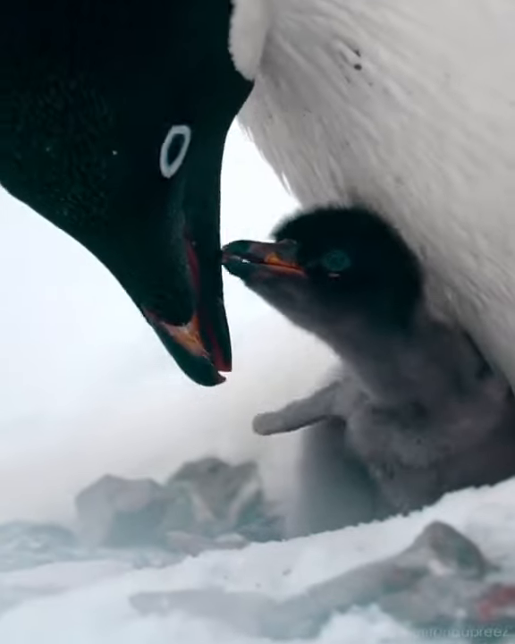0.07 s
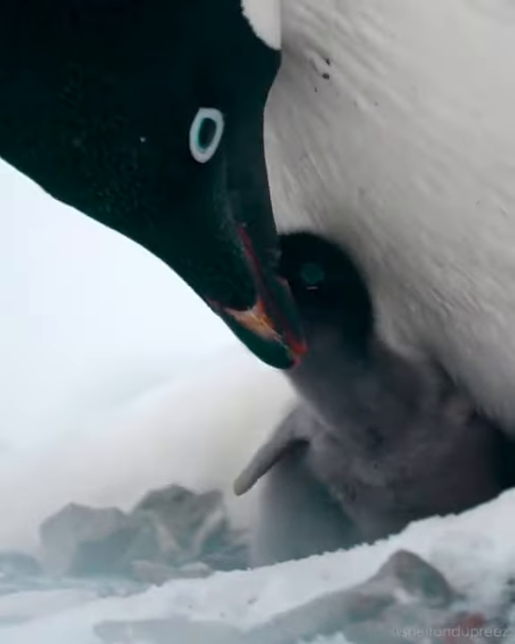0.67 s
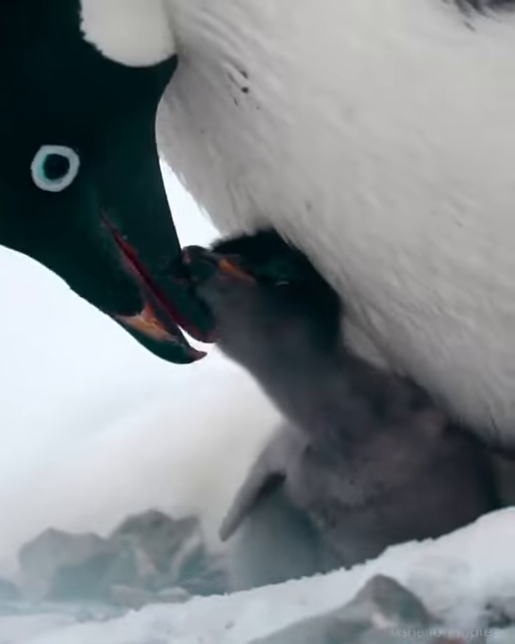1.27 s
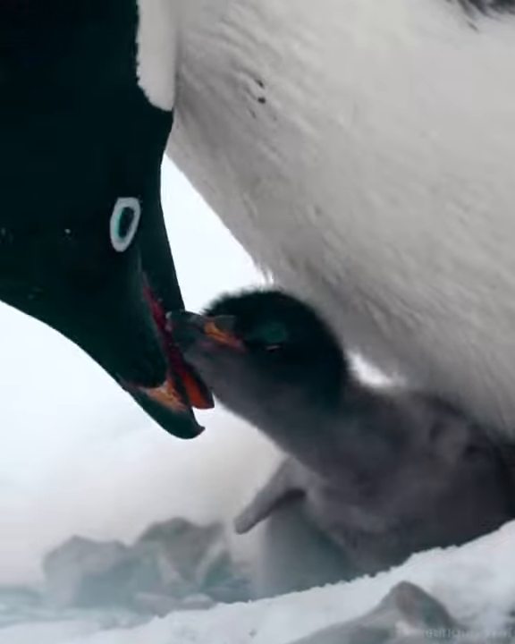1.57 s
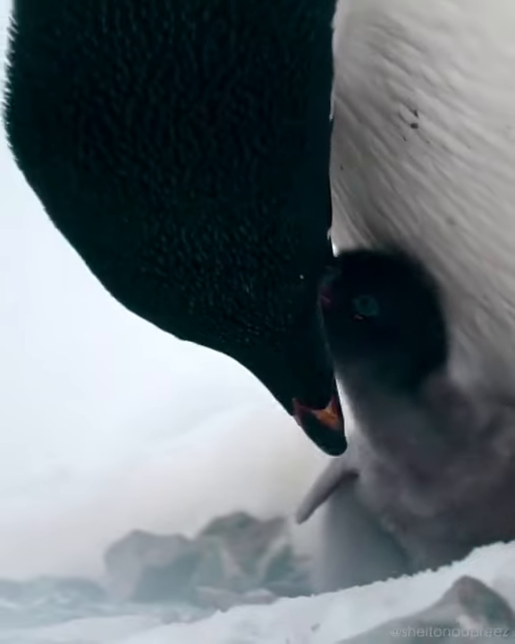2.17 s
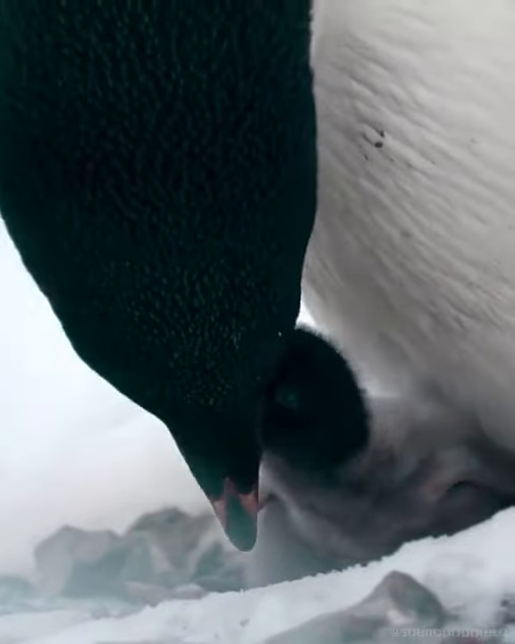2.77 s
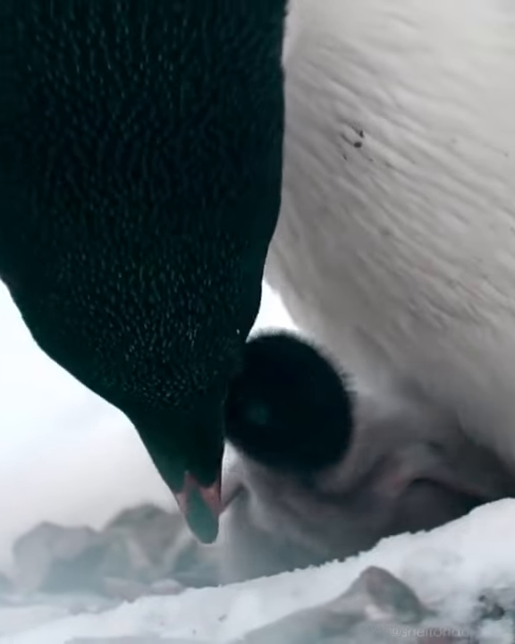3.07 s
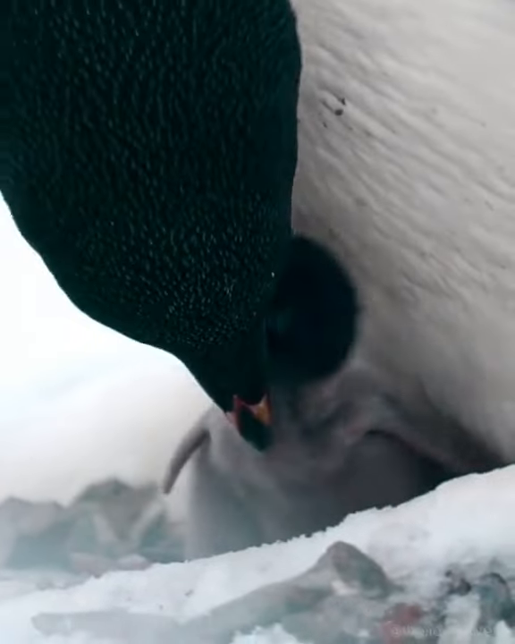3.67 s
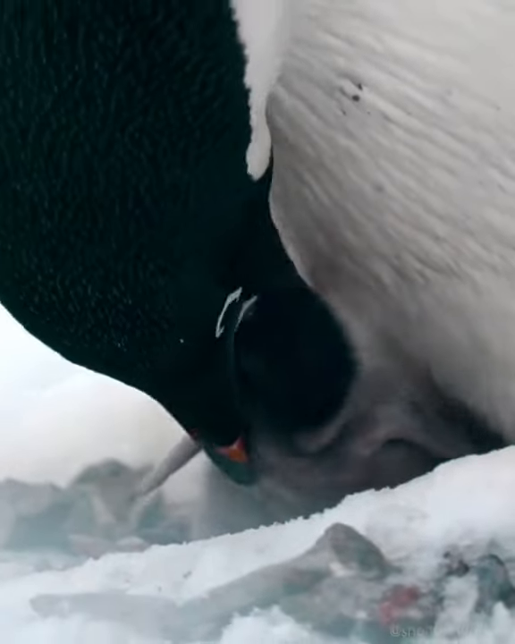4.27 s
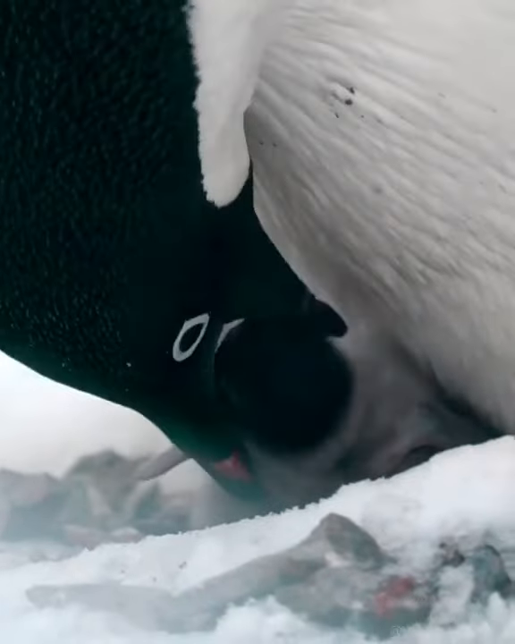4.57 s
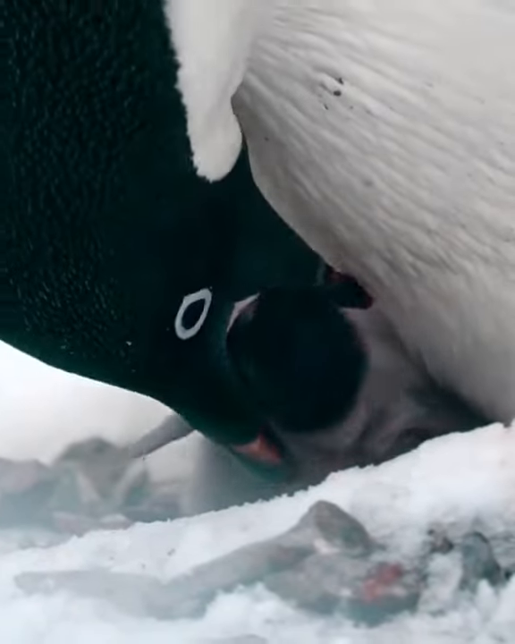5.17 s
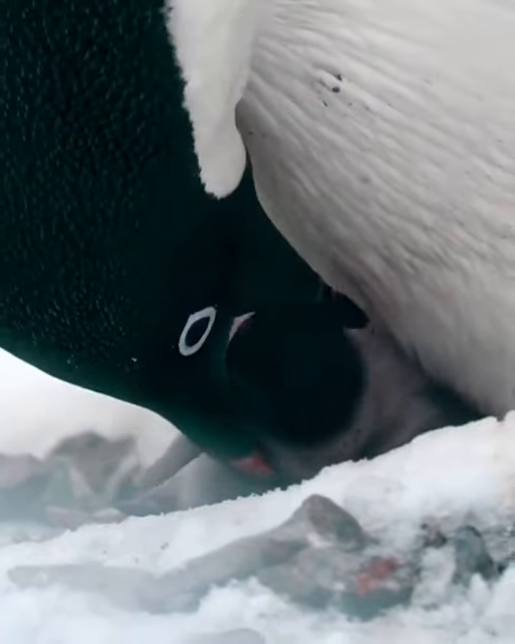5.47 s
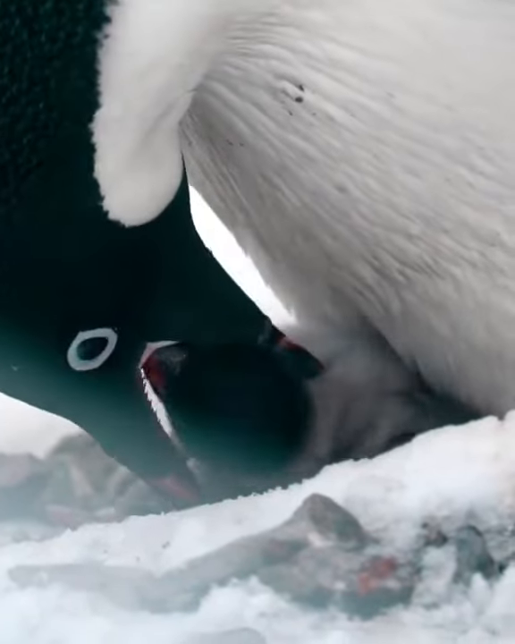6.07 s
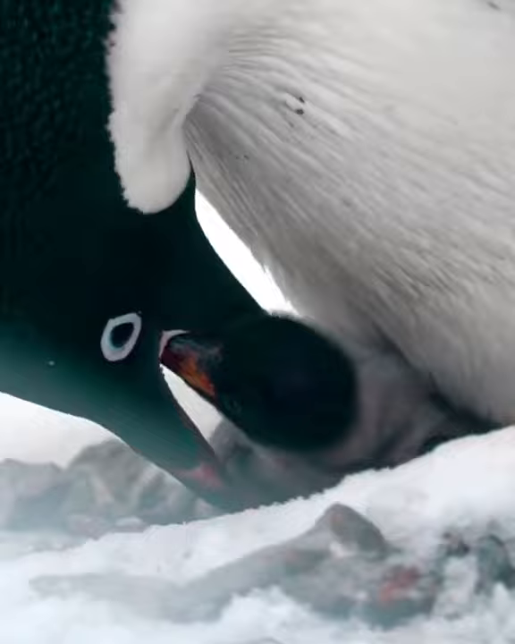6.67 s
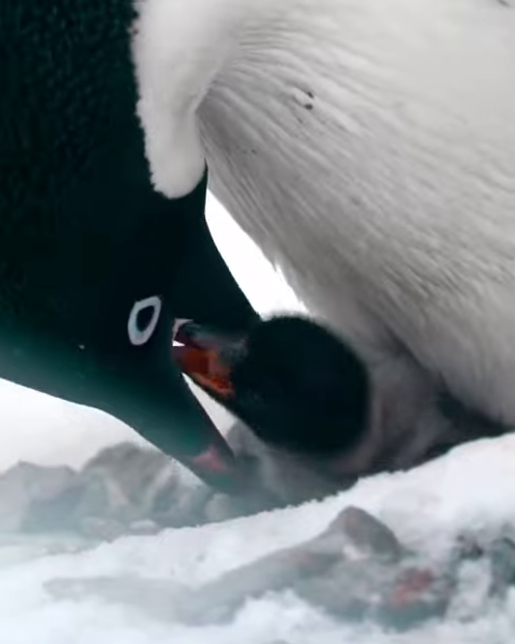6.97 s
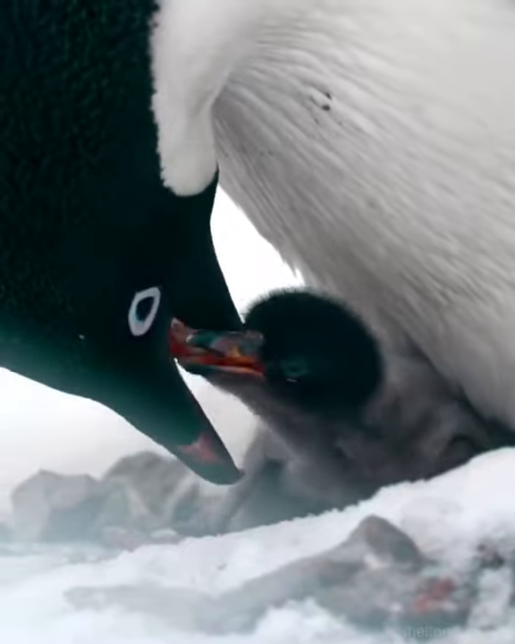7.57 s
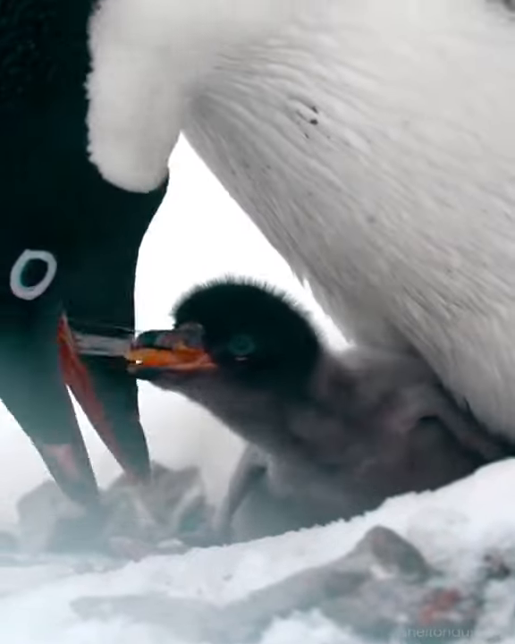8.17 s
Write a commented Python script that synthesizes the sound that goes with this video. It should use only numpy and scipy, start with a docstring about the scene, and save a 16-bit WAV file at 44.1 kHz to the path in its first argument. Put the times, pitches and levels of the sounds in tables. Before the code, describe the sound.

An adult penguin gives a harsh, throbbing bray close by while chicks peep and rasp for food, with wet bill clicks.

```python
"""Penguin at a snowy nest

Close to a stereo microphone, an adult bends over its chicks and brays with both sides of its syrinx:
a growl, a run of throbs and a long indrawn note. The chicks whistle and rasp for food, and wet bills
click and smack. Soft low bumps buffet the microphone; stones answer in the faint air of the colony."""
import sys
import numpy as np
from scipy import signal
from scipy.fft import rfft, irfft, next_fast_len
from scipy.io import wavfile
from scipy.ndimage import uniform_filter1d, map_coordinates

SR = 44100
rng = np.random.default_rng(int(sys.argv[2]) if len(sys.argv) > 2 else 0)


def generate_wav(signal):
    """Clip the signal to [-1, 1] and save it as 16-bit WAV at the path in sys.argv[1]."""
    frames = np.transpose(np.atleast_2d(signal))
    scaled = np.clip(frames, -1, 1) * 32767
    pcm = np.round(scaled).astype(np.int16)
    wavfile.write(sys.argv[1], SR, pcm)


N = 371322


def amp(db):
    """Decibels to gain."""
    return 10 ** (np.asarray(db) / 20)


def unit(x):
    """Scale to rms 1."""
    return x / np.sqrt(np.mean(x ** 2) + 1e-20)


def clock():
    """The time of every sample, in seconds."""
    return np.arange(N) / SR


def along(points, hz):
    """Read (Hz, value) points at hz, on a log axis."""
    freqs, values = np.transpose(points)
    return np.interp(np.log(hz + 1), np.log(freqs + 1), values)


def curves(rows):
    """One value per sample for each column after the time."""
    times, *columns = np.transpose(rows)
    return [np.interp(clock(), times, column) for column in columns]


def gate(t, start, end, edge):
    """A window from start to end, with fades of edge seconds centred on both."""
    return np.sin(np.pi / 2 * np.clip(np.minimum(t - start, end - t) / edge + .5, 0, 1)) ** 2


def wobble(rate, size=N):
    """A smooth random curve, rate knots a second."""
    knots = rng.standard_normal(int(size * rate / SR) + 4)
    return map_coordinates(knots, [np.arange(size) * rate / SR])


def add(track, start, sound):
    """Mix a sound into a track from start seconds on."""
    part = track[..., max(round(start * SR), 0):][..., :sound.shape[-1]]
    part += sound[..., :part.shape[-1]]


def coloured(x, points):
    """x through a minimum-phase filter with the given (Hz, dB) shape."""
    size = 8192
    cepstrum = irfft(np.log(amp(along(points, np.fft.rfftfreq(size, 1 / SR)))), size)
    cepstrum[1:size // 2] *= 2
    cepstrum[size // 2 + 1:] = 0
    return signal.oaconvolve(x, irfft(np.exp(rfft(cepstrum)), size))[:N]


def noise(points):
    """Coloured noise of rms 1."""
    return unit(coloured(rng.standard_normal(N), points))


def highpass(order, hz):
    """The sections of a Butterworth low cut."""
    return signal.butter(order, hz, "high", fs=SR, output="sos")


def shifting(x, depth_db, size=512):
    """x at rms 1, with resonances that come and go."""
    spectra = signal.stft(x, nperseg=size)[2]
    field = uniform_filter1d(rng.standard_normal(spectra.shape), size=4, axis=0)
    field = uniform_filter1d(field, size=10, axis=1)
    return unit(signal.istft(spectra * amp(depth_db * unit(field)), nperseg=size)[1][:N])


def spread(mid, side):
    """Left and right from mid and side."""
    return np.array([mid + side, mid - side])


def membrane(hz, waver, jitter, shimmer_db, rough):
    """One side of the syrinx: uneven pulses, with a puff of turbulence in each cycle."""
    cycles = np.cumsum(hz * (1 + waver * wobble(110))) / SR
    beats = np.arange(1, int(cycles[-1]))
    chance = rng.standard_normal((N // 32, 2))[:len(beats)]
    scatter = np.interp(beats, cycles, jitter * np.ones(N)) * chance[:, 0]
    at = np.interp(beats + scatter, cycles, np.arange(N))
    size = amp(shimmer_db * chance[:, 1])
    first, late = at.astype(int), at % 1  # each pulse is shared between two samples
    pulses = np.bincount(first, size * (1 - late), N + 1) + np.bincount(first + 1, size * late, N + 1)
    puffs = rng.standard_normal(N) * (1 + np.cos(2 * np.pi * cycles)) ** 2
    return unit(pulses[:N]) + rough * unit(puffs)


# The air behind the nest. Each row: frequency in Hz, gain in dB.
AIR_TONE = [(25, -4.5), (120, -3), (400, -7), (900, -7), (1600, 6.5), (2600, -10), (4000, -13),
            (7000, -20.5), (14000, -31.5), (16000, -45)]


def colony_air():
    """A faint, steady wash of noise, wide across the microphone."""
    return spread(amp(-76.5) * noise(AIR_TONE), amp(-77.5) * noise(AIR_TONE))


# The echo around the nest. Each row: frequency in Hz, time to fall 60 dB in seconds.
STONE_DECAY = [(200, 1), (1500, 0.49), (8000, 0.2)]


def stone_echo(x):
    """The short, scattered answer of the nearby stones, 5 ms late and almost mono."""
    hz, t, spectra = signal.stft(rng.standard_normal((2, SR // 3)), SR, nperseg=256)
    decay = amp(-60 * t / along(STONE_DECAY, hz)[:, None])
    mid, side = signal.istft(spectra * decay, SR, nperseg=256)[1]
    tail = spread(mid, amp(-36) * side) / np.linalg.norm(mid)
    return signal.fftconvolve(np.pad(x, (SR // 200, 0))[None], tail, axes=1)[:, :N]


# Three short, rough grunts, like throbs of another penguin's bray.
# Each row: centre and length in seconds, level in dB, pitch in Hz.
ADULT_GRUNTS = [(0.101, 0.051, -45.5, 304), (0.174, 0.041, -49.5, 258.3), (0.279, 0.073, -52.5, 276)]
# The grunting throat. Each row: frequency in Hz, gain in dB.
GRUNT_TONE = [(150, -21), (300, -2.5), (550, -11), (900, -20), (1350, 1), (1900, -1.5), (2600, -32.5),
              (3550, -14), (4200, -34.5), (8000, -56)]


def grunts():
    """Short, very rough pushes of an adult's voice."""
    t = clock()
    centres, _, _, pitches = np.transpose(ADULT_GRUNTS)
    voice = membrane(np.interp(t, centres, pitches), waver=.04, jitter=.07, shimmer_db=2, rough=.3)
    voice += .7 * rng.standard_normal(N)
    level = sum(amp(db - 7 * ((t - centre) / (length / 2)) ** 2)
                for centre, length, db, _ in ADULT_GRUNTS)
    return level * unit(coloured(voice, GRUNT_TONE))


# Knocks right on the microphone. Each row: start in seconds, level in dB, pitch in Hz.
MIC_BUMPS = [(0.294, -43, 290), (0.642, -42, 193), (0.731, -43.5, 145), (0.938, -44.5, 180),
             (0.997, -46, 187), (4.027, -45, 226), (4.059, -48, 133), (4.934, -44, 187), (5.057, -47, 160),
             (5.28, -50, 188), (6.467, -44, 179), (6.873, -47.5, 222), (7.084, -48.5, 193.8),
             (7.171, -49, 196), (7.308, -41, 280), (7.445, -45.5, 157), (7.547, -42, 186),
             (7.624, -37.5, 170), (7.763, -41.5, 133), (7.866, -42.5, 195.8), (7.935, -46, 157),
             (8.222, -37.5, 176.5), (8.38, -45.5, 241)]
# Spells of low patter on it. Each row: start in seconds, end in seconds, level in dB.
MIC_PATTERS = [(0, 0.828, -66), (0.932, 1.252, -59.5), (1.73, 3.969, -76), (3.993, 4.76, -64.5),
               (4.901, 5.123, -63), (5.564, 6.59, -73.5), (6.968, 7.39, -58.5), (7.44, 7.998, -55.5),
               (7.985, 8.45, -61.5)]
# The dull noise in both. Each row: frequency in Hz, gain in dB.
BUFFET_TONE = [(25, -37.5), (55, -32), (100, 0), (170, 1.5), (260, -5.5), (400, -15.5), (800, -31.5),
               (2000, -71)]


def buffeting():
    """Dull knocks and a patter of smaller, rounded ones, unlike on the two sides of the microphone."""
    bumps, t = np.zeros((2, N)), np.arange(SR // 8) / SR
    thud = noise(BUFFET_TONE)
    rise = t / .0092
    swell = (rise * np.exp(1 - rise)) ** 2
    for start, db, hz in MIC_BUMPS:
        for track, (detune, turn, place) in zip(bumps, rng.random((2, 3))):
            push = swell * np.sin(2 * np.pi * (hz * np.exp(.27 * (detune - .5)) * t + turn))
            scuff = swell * unit(thud[int(place * SR):][:len(t)])
            add(track, start, amp(db - 5) * (push + .82 * scuff))
    bumps = signal.sosfilt(highpass(2, 85), bumps)
    spells = sum(amp(db) * gate(clock(), start, end, .055) for start, end, db in MIC_PATTERS)
    level = (amp(-83.5) + spells) * unit(amp(1.5 * wobble(17)))  # a faint patter lasts between spells
    lumps = amp(8 * np.tanh(wobble(55)))
    patter = [level * unit(lumps * noise(BUFFET_TONE)) for _ in range(2)]
    stereo = spread(mid=patter[0] + bumps[0], side=amp(4) * patter[1] + amp(3) * bumps[1])
    return stereo * amp([[1], [-1]])  # a little louder on the left


# The crackle of wet bills, heard close. Each row: frequency in Hz, gain in dB.
WET_BILL_TONE = [(800, -20), (2000, -2.5), (3200, 0.5), (4500, -3.5), (6500, -17), (9000, -32),
                 (13000, -33.5), (15000, -49)]


def bill_smacks(per_second=4.3):
    """Wet bills, locked for feeding, give off tiny bright bursts of crackle."""
    t = np.arange(SR // 20) / SR
    onsets = (rng.random(N) < per_second / SR) * rng.uniform(.3, 1, N)
    bursts = signal.fftconvolve(onsets, amp(-60 * t / .05) * (1 - np.exp(-t / .0065)))[:N]
    crackle = unit(coloured(bursts * rng.standard_normal(N) ** 3, WET_BILL_TONE))
    return amp(-77.5) * gate(clock(), start=3.6, end=6.45, edge=.1) * crackle


# Bills snapping, straight ahead. Each row: start in seconds, level in dB, ring in Hz.
BILL_CLICKS = [(1.108, -46.5, 3950), (2.989, -34.5, 2600), (5.909, -45, 1900), (3.639, -35, 2857),
               (3.805, -35.5, 2900), (3.941, -40.5, 2950), (4.25, -35, 2650), (4.411, -35, 2750),
               (4.586, -37, 2740), (4.623, -41.5, 3100), (5.069, -44, 3200), (5.11, -41, 2780),
               (5.531, -38.5, 2770), (6.378, -32, 2820), (6.42, -43, 3420), (6.955, -42, 2400),
               (7.649, -35.5, 2390), (7.99, -43.5, 3105), (8.044, -27.5, 2382)]


def bill_clicks():
    """Horny bill edges snap together and ring for a few milliseconds, dulled by wetness."""
    out, t = np.zeros(N), np.arange(SR // 30) / SR
    for start, db, hz in BILL_CLICKS:
        phase = 2 * np.pi * hz * t
        ring = (np.sin(phase) + .5 * np.sin(.71 * phase)) * amp(-60 * t / .0069)
        crack = .03 * rng.standard_normal(len(t)) * amp(-60 * t / .0016)
        add(out, start, amp(db) * (ring + crack) * (1 - np.exp(-t / .00034)))
    return coloured(out, [(3500, 3), (5500, 5.5), (8000, 4.5), (14000, -24)])


def thin_hiss():
    """A brief, very high hiss that rides on one soft peep."""
    hiss = noise([(5000, -20), (9000, 8), (12500, -15), (15000, -18.5)])
    return amp(-77) * gate(clock(), start=5.36, end=5.42, edge=.028) * hiss


# Hoarse begging from the nest. Each row: start and end in seconds, throat and bill levels in dB.
RASP_CALLS = [(1.085, 1.178, -82, -65.5), (1.246, 1.315, -78, -58), (1.372, 1.462, -76.5, -62),
              (5.748, 5.901, -65, -69), (5.926, 6.061, -63.5, -63.5), (6.092, 6.261, -59.5, -60),
              (6.289, 6.438, -57, -56.5), (6.483, 6.787, -59.5, -53.5), (6.839, 6.968, -58, -50.5),
              (7.015, 7.2, -59, -50.5), (7.256, 7.361, -60, -49), (7.401, 7.452, -62, -52),
              (7.487, 7.589, -65, -53), (7.655, 7.778, -70.5, -59), (7.838, 7.975, -71, -58),
              (8.017, 8.199, -70.5, -55), (8.261, 8.447, -72, -55)]
# The rasping throat, then the open bill. Each row: frequency in Hz, gain in dB.
RASP_THROAT_TONE = [(150, -55.5), (330, -21), (520, -4.5), (750, -7.5), (1200, 3), (1550, 2), (1900, -5),
                    (2500, 1), (4000, -43), (8000, -57)]
RASP_BILL_TONE = [(1200, -25.5), (2300, -15), (3000, 11.5), (3550, 14), (4200, 0), (5000, -19.5),
                  (7000, -31), (9500, -39.5), (15000, -88)]


def chick_rasps(edge_hz=328, rise=.25):
    """Fluttering air rushes through throat and open bill; a hoarse pitch arches over each call."""
    t = clock()
    throat, bill, arch = np.zeros((3, N))
    for start, end, throat_db, bill_db in RASP_CALLS:
        near = slice(max(int((start - .05) * SR), 0), int((end + .05) * SR))
        flow = gate(t[near], start, end, .039)
        throat[near] += amp(throat_db) * flow
        bill[near] += amp(bill_db) * flow
        arch[near] += np.sin(np.pi * np.clip((t[near] - start) / (end - start), 0, 1))
    flutter = amp(1.1 * wobble(220) + .6 * wobble(25))
    # the slack membrane rattles, and moisture crackles in the bill
    rattle = membrane(edge_hz * (1 + rise * arch), waver=.025, jitter=.02, shimmer_db=2, rough=.3)
    rattle += .8 * rng.standard_normal(N)
    crackle = unit((rng.random(N) < 120 / SR) * rng.standard_normal(N))
    croak = shifting(coloured(rattle, RASP_THROAT_TONE), depth_db=4.5, size=1024)
    spray = shifting(coloured(rattle + .15 * crackle, RASP_BILL_TONE), depth_db=4.5, size=1024)
    return flutter * (amp(.7) * throat * croak + amp(-5.5) * bill * spray)


def faint_notes(gap_s=.22):
    """Notes for chick_peeps: the other chicks, faint and loosely spaced behind the near ones."""
    notes, slots = [], np.arange(0, N / SR - gap_s, gap_s)
    for slot, (late, size, pitch, loud) in zip(slots, rng.uniform(-.89, 1, (N // 1000, 4))):
        start, length = slot + gap_s * (1 + late) / 2, .055 * (1 + .17 * size)
        hz = 1580 * (1 + .12 * pitch)
        legs = 2 if size > .5 else 1
        notes.append((start, length, 1.5 * hz, hz, -76.5 + 4 * loud, -18, legs, 2))
    return notes


# Loud three-note begging, close by. Each row: start in seconds, level in dB, pitch ratio.
BEGGING_PHRASES = [(4.727, -44, 1.012), (5.612, -43, 1.042), (6.494, -43, 1.02)]
# The two dips of a phrase, the second deeper. Each row: delay and length in seconds,
# lowest pitch in Hz before the phrase's ratio, relative level in dB.
BEGGING_DIPS = [(0, .038, 1782, -0.5), (0.079, .058, 1507, 2.2)]
BEGGING_EDGE_HZ = 2140  # where the dips begin and end, before the ratio


def begging_notes(overtone_db=-16.5, squeak_s=.023, squeak_hz=1855):
    """Notes for chick_peeps: two dips, with a squeak as the voice breaks after each, then a slide."""
    notes = []
    for start, db, ratio in BEGGING_PHRASES:
        edge_hz = ratio * BEGGING_EDGE_HZ
        for delay, length, hz, more_db in BEGGING_DIPS:
            notes.append((start + delay, length, edge_hz, ratio * hz, db + more_db, overtone_db, 2, 2))
            notes.append((start + delay + length, squeak_s, edge_hz, squeak_hz, db - 17, -6, 1, 1))
        # the closing slide drops at once, then flattens out
        notes.append((start + .157, .078, edge_hz, ratio * 1090, db, overtone_db + 3.5, 1, 3.2))
    return notes


# Single peeps from the nest that dip or arch and come back. Each row: start and length in seconds,
# edge and turning pitch in Hz, level in dB, relative overtone level in dB.
PEEP_SWOOPS = [(0.333, 0.05, 2270, 1860, -57, -33), (0.488, 0.091, 1520, 1952, -56.5, -40),
               (0.848, 0.054, 1800, 1425, -58.5, -35), (0.969, 0.04, 1860, 1404, -53.5, -25),
               (0.968, 0.058, 2150, 1766, -64.5, -13), (1.078, 0.081, 1270, 1596, -50, -19.5),
               (1.245, 0.083, 1500, 1674, -62.5, -24), (1.37, 0.061, 1320, 1680, -58, -28),
               (4.073, 0.063, 1750, 1516, -54.5, -7), (4.386, 0.04, 2050, 1765, -54.5, 0.5),
               (4.451, .075, 1710, 1420, -43.5, -13), (5.067, 0.066, 1900, 1523, -58.5, -8.5),
               (5.342, 0.088, 2096, 1310, -51.5, -17), (7.849, 0.051, 2250, 1720, -71, -14),
               (8.297, 0.047, 1940, 1710, -60, -10)]
# Peeps that slide down or up. Each row: start and length in seconds, first and last pitch in Hz,
# level in dB, relative overtone level in dB.
PEEP_SLIDES = [(.215, 0.044, 1850, 2200, -65, -28), (0.449, 0.04, 2300, 1490, -57, -35),
               (0.927, 0.024, 1380, 1790, -55, -16.5), (1.053, 0.047, 2100, 1830, -67.5, -8),
               (1.248, 0.049, 1794, 1220, -54.5, -28), (1.419, 0.055, 1880, 1148, -52.5, -35),
               (1.599, 0.042, 1950, 1445, -68, -22), (2.952, 0.058, 1950, 1450, -52.5, -10),
               (3.334, 0.045, 2100, 1628, -53.5, -19), (3.439, 0.049, 1850, 1330, -46.5, -16),
               (5.169, 0.023, 2150, 1600, -63.5, -17), (5.578, 0.048, 1830, 1546, -56.5, -5.5),
               (6.211, 0.047, 2200, 1473, -54, -20), (7.421, 0.023, 2200, 1590, -62, -22),
               (7.477, .017, 1600, 2160, -59.5, -21), (8.406, 0.023, 1950, 1726, -61, -5)]
# A chick's throat, bill and breath. Each row: frequency in Hz, gain in dB.
PEEP_THROAT_TONE = [(1000, -27.5), (1300, -11.5), (1550, -4), (1750, 2.5), (1900, 7.5), (2050, 1.5),
                    (2300, 9)]
PEEP_BILL_TONE = [(2650, -2.5), (3100, -5), (3700, 4), (4900, -7.5), (6000, 2.5), (6700, -9.5),
                  (7500, -2.5), (8500, -11), (11000, -16)]
PEEP_BREATH_TONE = [(800, -13), (1600, 8.5), (2600, -0.5), (3600, 2), (5000, -8.5), (7500, -24.5),
                    (9500, -37.5), (13000, -52)]


def chick_peeps():
    """Whistles flare as they cross the throat's resonance; a rough second voice and breath go along."""
    # a note of one leg slides away, one of two comes back; bend curves the glide
    notes = [(*row, 2, 2) for row in PEEP_SWOOPS] + [(*row, 1, 1.5) for row in PEEP_SLIDES]
    notes += begging_notes() + faint_notes()
    whistle, upper, flow = np.zeros((3, N))
    for start, length, edge_hz, turn_hz, db, overtone_db, legs, bend in notes:
        t = np.arange(int((length + .032) * SR)) / SR - .02
        to_turn = 1 - legs * np.clip(t / length, -.04, 1.04)
        period = 1 / turn_hz + (1 / edge_hz - 1 / turn_hz) * np.abs(to_turn) ** bend
        hz = (1 + .0085 * wobble(440, len(t))) / period
        phase = 2 * np.pi * np.cumsum(hz) / SR
        throat_db = along(PEEP_THROAT_TONE, hz)
        # uneven closing of the membrane frays the overtones, the more so the lower it sinks
        frayed = phase + .26 * (BEGGING_EDGE_HZ / hz) ** 2 * wobble(1200, len(t))
        overtones = np.sin(phase + frayed)
        for harmonic, harmonic_db in (3, -15), (4, -18), (5, -27):
            overtones += amp(harmonic_db) * np.sin(harmonic * frayed)
        # the other side of the syrinx sounds a fifth higher
        second = amp(-9.5) * np.sin(1.5 * phase + .8 * wobble(700, len(t)))
        tremor_db = .8 * wobble(250, len(t))
        level = np.sqrt(2) * amp(db + tremor_db) * gate(t, .0024, length - .002, .014)
        upper_level = level * amp(overtone_db + .3 * throat_db + 3 * tremor_db)
        hoarse = .5 * min(amp(overtone_db + 14), 1)  # forced notes are scratchy, soft ones pure
        add(whistle, start + t[0], level * amp(throat_db) * np.sin(phase + hoarse * (frayed - phase)))
        add(upper, start + t[0], upper_level * (overtones + second))
        add(flow, start + t[0], amp(db + .5 * overtone_db) * gate(t, -.0038, length + .0069, .24))
    breath = amp(-13) * flow * amp(1.3 * wobble(300)) * noise(PEEP_BREATH_TONE)
    return whistle + coloured(upper, PEEP_BILL_TONE) + breath


# The two sides of the syrinx on the in-breath. Each row: top pitch in Hz, sag as a share of it.
INDRAWN_VOICES = [(339, .16), (399, .21)]
# The adult's throat with air going in. Each row: frequency in Hz, gain in dB.
INHALE_TONE = [(200, -33), (400, -22), (670, 4.5), (800, -3), (1020, -14.5), (1300, -24), (1650, -18.5),
               (2050, -10), (2450, -8), (2750, -17), (3020, -27), (3400, -19), (3900, -16), (5100, -18.5),
               (6200, -45), (7500, -32.5), (10500, -54), (12000, -72.5)]


def indrawn_note(top_s=4.275, loudest_s=4.287, rise_s=.37, fall_s=.26):
    """Two cleaner voices rise and fall in one arch, beating and sweeping through a sharp resonance."""
    t = clock()
    arch = np.minimum(((t - top_s) / np.where(t < top_s, rise_s, fall_s)) ** 2, 2)
    slack = np.minimum(arch, 1)  # the voices turn rough where the breath is weak
    low, high = (membrane(hz * (1 - sag * arch), waver=.005, jitter=.004 + .014 * slack,
                          shimmer_db=.6, rough=.045 + .12 * slack) for hz, sag in INDRAWN_VOICES)
    voice = coloured(low + amp(2) * high, INHALE_TONE)
    voice += amp(-11) * signal.lfilter(*signal.iirpeak(2330, Q=15, fs=SR), voice)  # open throat rings
    # above the steady first resonance the overtones are ragged
    upper = signal.sosfiltfilt(highpass(3, 1300), voice)
    ragged = shifting(upper * (1 + (.3 + .15 * slack) * wobble(700)), depth_db=2.5)
    voice = voice - upper + 1.2 * upper.std() * ragged
    flow = gate(t, start=3.94, end=4.555, edge=.17)
    voice /= np.sqrt(np.average(voice ** 2, weights=flow))
    # the harder the bird draws, the more edge the note has
    force = amp(-12 * ((t - loudest_s) / rise_s) ** 2)
    edge = signal.sosfilt(highpass(1, 4000), voice)
    return amp(-43) * force * flow * (voice + 2.77 * (force - .7) * edge)


# The growl that carries the bray, close to the microphone.
# Each row: time in seconds, the low voice's pitch between pushes in Hz, level in dB.
GROWL = [(1.735, 260.6, -73.5), (1.79, 296.5, -48.5), (1.83, 340.8, -43), (1.962, 359.4, -40.5),
         (1.99, 333.6, -47.5), (2.98, 330.6, -52.5), (3.066, 406.8, -37.5), (3.14, 331.5, -48),
         (3.359, 331, -52), (3.725, 331.1, -55), (3.762, 391, -40), (3.85, 368.5, -45.5), (3.94, 340, -51),
         (3.999, 313.8, -57)]
# The gaps between pushes of air, in seconds; one throb fills the time from each to the next.
THROB_GAPS_S = [1.991, 2.104, 2.211, 2.302, 2.387, 2.465, 2.539, 2.605, 2.669, 2.732, 2.796, 2.857, 2.911,
                2.98, 3.067, 3.137, 3.259, 3.364, 3.447, 3.516, 3.585, 3.652, 3.717]
# How far a push raises the pitch. Each row: time in seconds, pitch ratio.
PUSH_LIFT = [(2.05, 1.163), (2.28, 1.233), (2.83, 1.313), (2.95, 1.415), (3.1, 1.16), (3.4, 1.27),
             (3.48, 1.185), (3.65, 1.24)]
# The throat with air going out, its change as it slackens between pushes, and the crackle
# at the height of a push. Each row: frequency in Hz, gain in dB.
EXHALE_TONE = [(190, -41.5), (300, -9.5), (400, -8.5), (510, -2.5), (640, -3.5), (850, -8.5), (1150, 2.5),
               (1550, 2.5), (1850, -4.5), (2200, -11.5), (2950, -19), (3500, -12.5), (4300, -23.5),
               (5700, -40), (6800, -66), (14000, -72)]
SLACK_TONE = [(240, 18.5), (400, 4), (700, 0.5), (1050, 2.5), (1300, -5), (1750, 1.5), (2300, 1),
              (4000, -2)]
PUSH_CRACKLE_TONE = [(1500, -22), (3400, 3.5), (5500, -3), (6600, -33), (12000, -45.5)]


def bray(voice_ratio=1.245, rest_s=.026):
    """Both sides of the syrinx growl; each push of air lifts their loudness and pitch into a throb."""
    t = clock()
    low_hz, growl_db = curves(GROWL)
    high_hz = voice_ratio * low_hz * (1 + .02 * wobble(14))
    level = amp(growl_db) * gate(t, GROWL[0][0], GROWL[-1][0], .027)
    push = np.zeros(N)
    for start, end in zip(THROB_GAPS_S, THROB_GAPS_S[1:]):
        near = slice(int((start - .05) * SR), int((end + .05) * SR))
        off_centre = np.abs(2 * t[near] - start - end) / (end - start - rest_s)
        level[near] = np.maximum(level[near], amp(-36 - 11.5 * off_centre ** 3.3))
        push[near] = np.maximum(push[near], np.exp(-.8 * off_centre ** 2))
    lift = push * (curves(PUSH_LIFT)[0] - 1)
    strain = np.clip(lift / lift.max(), 0, 1)  # hard pushes make the membranes rattle
    low, high = (membrane(hz * (1 + lift), waver=.016, jitter=.02 + .008 * strain,
                          shimmer_db=1, rough=.15 + .1 * strain) for hz in (low_hz, high_hz))
    # the two sides share one airstream and throttle each other at their difference rate
    beat_hz = (high_hz - low_hz) * (1 + lift) * (1 + .2 * wobble(40))
    beat = 1 + .22 * np.cos(2 * np.pi * np.cumsum(beat_hz) / SR)
    voice = shifting(coloured(beat * (low + high), EXHALE_TONE), depth_db=1.8)
    snaps = unit((low + high) * amp(3 * wobble(500)))
    voice += amp(-22) * strain * shifting(coloured(snaps, PUSH_CRACKLE_TONE), depth_db=5)
    slack = (1 - push) ** 2
    return amp(-1) * level * ((1 - slack) * voice + slack * coloured(voice, SLACK_TONE))


# How the indrawn note beams to the microphone's left. Each row: frequency in Hz, side gain in dB.
INDRAWN_LEAN = [(700, -19.5), (1200, 0), (2200, -6), (5000, -7.5), (8000, -9.5)]


def scene():
    """The birds straight ahead of the microphone, in the faint air of the colony."""
    adults, drawn = bray() + grunts(), indrawn_note()
    chicks = chick_peeps() + bill_clicks() + bill_smacks() + chick_rasps() + thin_hiss()
    air = colony_air()
    direct = adults * amp([[-.2], [.2]]) + spread(drawn, coloured(drawn, INDRAWN_LEAN)) + chicks
    echo = stone_echo(amp(-22) * (adults + drawn) + amp(-15) * chicks)
    return direct + echo + buffeting() + air


def record(dry):
    """The recorder keeps nothing above 15 kHz."""
    size = next_fast_len(N + SR // 4)
    in_band = np.fft.rfftfreq(size, 1 / SR) < 15000
    return irfft(rfft(dry, size) * in_band, size)[..., :N]


dry = scene()
out = record(dry)
generate_wav(out)
```